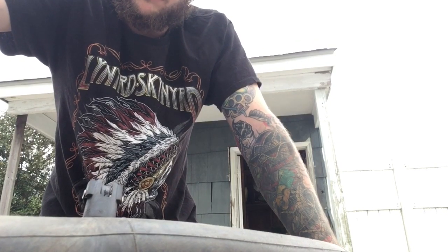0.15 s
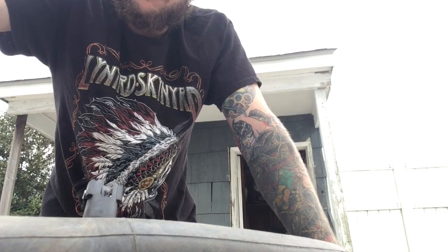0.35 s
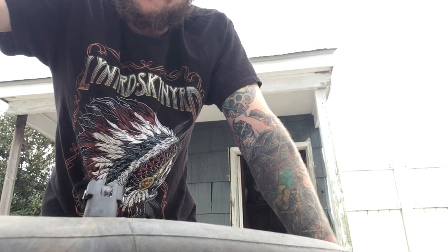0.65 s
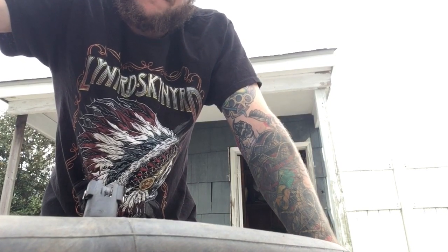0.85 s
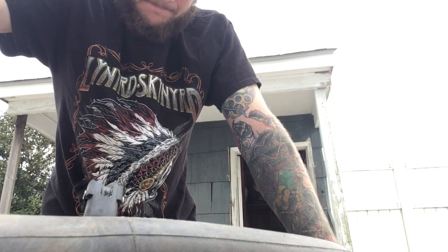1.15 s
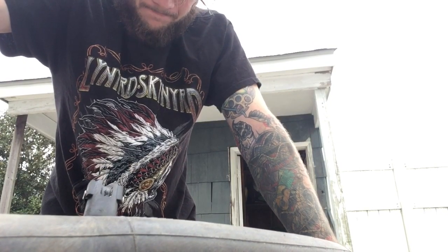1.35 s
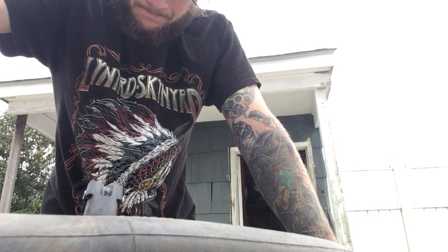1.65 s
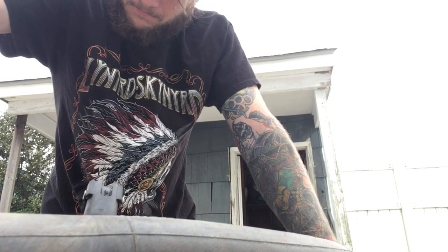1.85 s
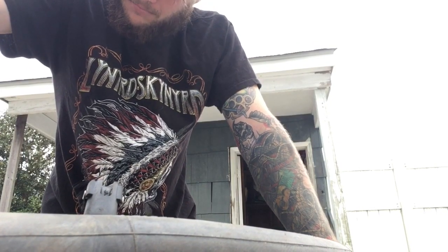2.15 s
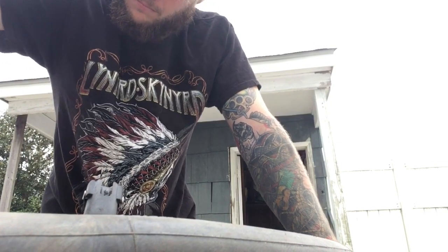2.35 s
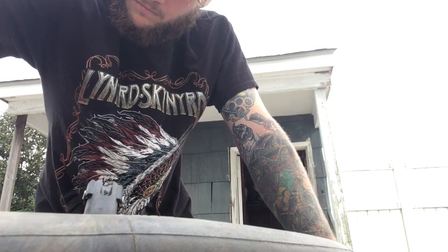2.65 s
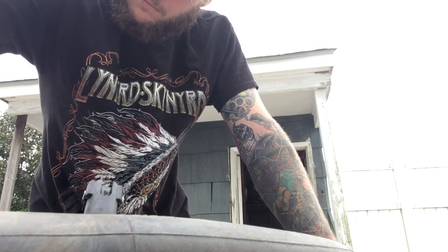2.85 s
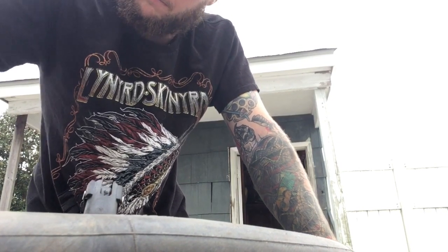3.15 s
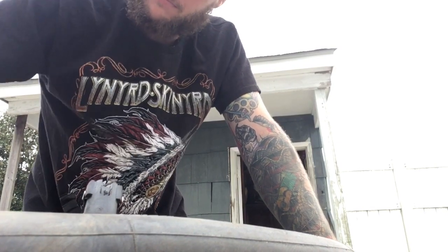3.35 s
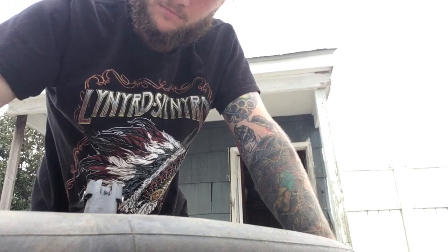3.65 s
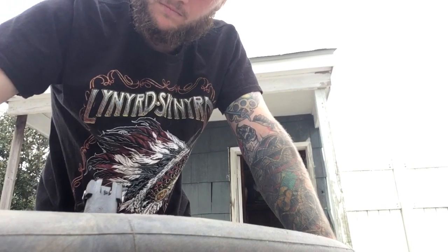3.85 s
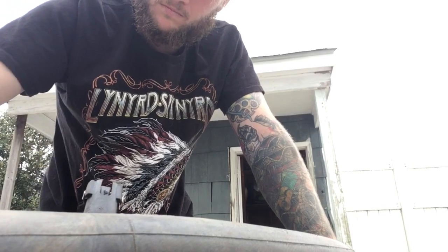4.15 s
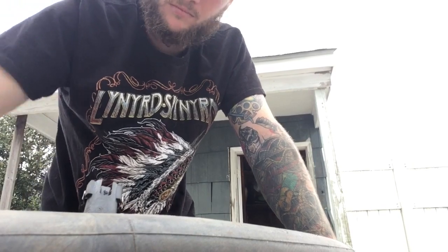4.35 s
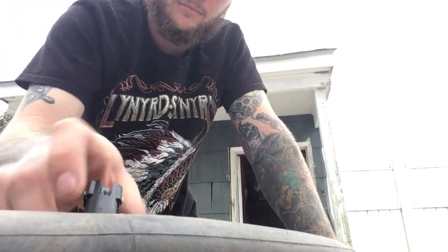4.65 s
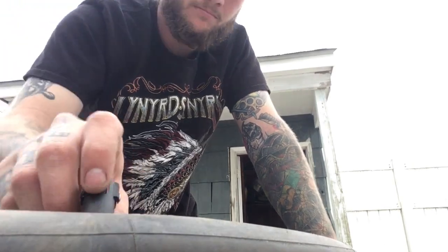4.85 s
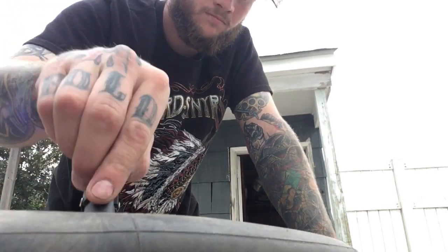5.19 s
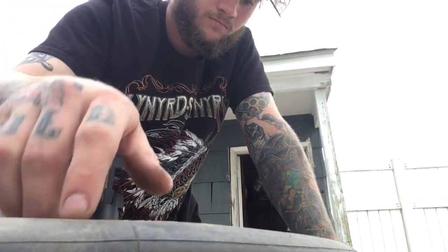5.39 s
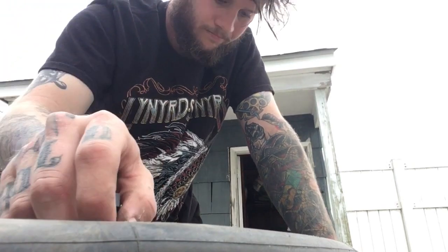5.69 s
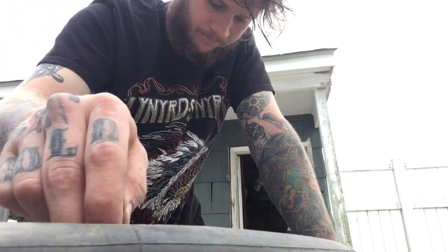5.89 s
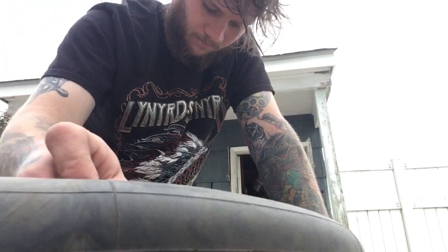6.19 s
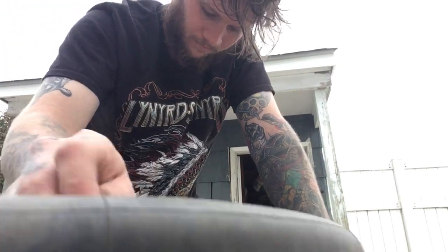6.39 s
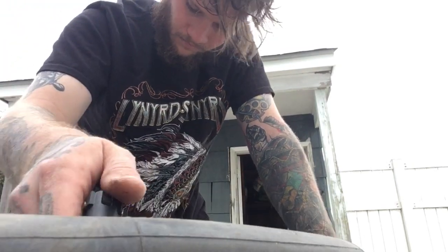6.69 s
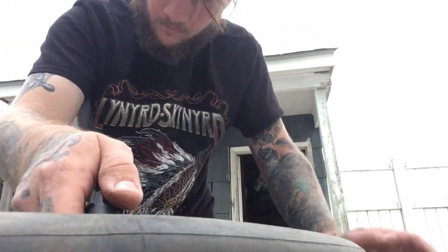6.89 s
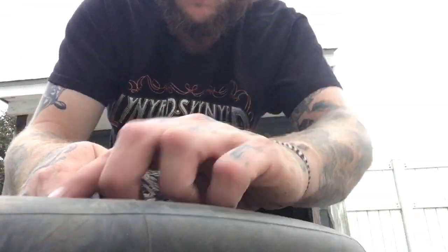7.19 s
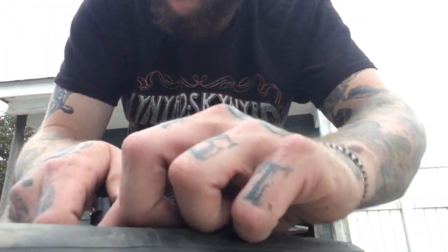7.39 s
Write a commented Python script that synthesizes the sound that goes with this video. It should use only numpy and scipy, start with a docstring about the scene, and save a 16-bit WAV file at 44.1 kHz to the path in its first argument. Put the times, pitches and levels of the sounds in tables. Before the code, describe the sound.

Close, harsh rattling of a little air pump outdoors stops abruptly after four seconds, followed by quiet taps, rubber rubbing and leaking air.

```python
"""Outdoors, close and dry: a small geared piston compressor pumps up a bicycle inner tube, then stops.
Each crank turn flutters the reed valves over gear clatter, hissing air and the hum of the casing;
the motor beats against the crank seven times a second. As it stalls, the casing shudders and gears clack.
Then fingers work the chuck on the valve: decaying noise makes the air spit, leak and blow, ringing modes
make the knocks and the pop of the chuck, and grainy noise makes hands rubbing the tube."""
import sys
import numpy as np
from scipy import signal
from scipy.fft import rfft, irfft
from scipy.io import wavfile

SR = 44100
rng = np.random.default_rng(int(sys.argv[2]) if len(sys.argv) > 2 else 0)


def unload_audio(sound):
    """Save the sound as a 16-bit wav file, at the path given as the first command line argument."""
    columns = np.transpose(np.atleast_2d(sound))
    # keep every value between -1 and 1, then stretch to whole-number steps
    steps = np.round(np.clip(columns, -1, 1) * 32767)
    wavfile.write(sys.argv[1], SR, steps.astype(np.int16))


N = 332073
TIME = np.arange(N) / SR


def amp(db):
    """Decibels to gain."""
    return 10 ** (np.asarray(db) / 20)


def unit(x):
    """Scales to rms 1."""
    return x / np.sqrt(np.mean(x ** 2) + 1e-20)


def curve(rows):
    """Joins rows of (s, value) by straight lines."""
    return np.interp(TIME, *np.transpose(rows))


def add(mix, s, sound):
    """Mixes a sound in from time s."""
    part = mix[round(s * SR):][:len(sound)]
    part += sound[:len(part)]


def colour(x, spectrum, lifts=(), size=4096):
    """Causal filter of energy 1: a smooth spectrum with resonances standing out of it."""
    hz = np.fft.rfftfreq(size, 1 / SR)
    f, db = np.transpose(spectrum)
    power = amp(np.interp(np.log(hz + 1), np.log(f), db)) ** 2
    for centre, width, lift_db in lifts:
        bell = 1 / (1 + (2 * (hz - centre) / width) ** 2)
        power = power * (1 + (amp(lift_db) ** 2 - 1) * bell)
    log_gain = np.log(np.r_[power, power[-2:0:-1]] + 1e-12) / 2
    # minimum phase: the Hilbert transform of the log gain gives the phase
    response = np.exp(np.conj(signal.hilbert(log_gain)))
    taps = np.fft.ifft(response).real[:size // 2]
    return signal.oaconvolve(x, taps / np.linalg.norm(taps))[:len(x)]


def resonate(x, hz, width):
    """One resonance, scaled to rms 1."""
    pole = np.exp((2j * np.pi * hz - np.pi * width) / SR)
    return unit(signal.lfilter([1], [1, -pole], x).real)


def wander(hz):
    """Smooth chance of rms 1, changing about hz times a second."""
    lowpass = np.exp(-(np.fft.rfftfreq(N, 1 / SR) / hz) ** 2)
    return unit(irfft(rfft(rng.standard_normal(N)) * lowpass, N))


def grit(grain_db, size=N):
    """White noise made of grains of uneven size."""
    noise, unevenness = rng.standard_normal((2, size))
    return unit(noise * amp(grain_db * np.clip(unevenness, -2.5, 2.5)))


def ring(modes, length_s=0.29):
    """Dying sines after one blow."""
    t = np.arange(int(length_s * SR)) / SR
    out = np.zeros(len(t))
    for hz, db, t60 in modes:
        out += amp(db) * np.exp(-np.log(1000) * t / t60) * np.sin(2 * np.pi * hz * t)
    return out


def swell(start, attack, hold, t60, db=0):
    """Gain that rises evenly, holds and dies away by 60 dB in t60 seconds."""
    rise = np.clip((TIME - start) / attack, 0, 1)
    since_hold = np.maximum(TIME - start - attack - hold, 0)
    return rise * amp(db) * np.exp(-np.log(1000) * since_hold / t60)


def together(gains):
    """Envelope of several unrelated noises: their powers add."""
    return np.linalg.norm(gains, axis=0)


def rush(gain, spectrum, grain_db=0, flicker_db=1, lifts=()):
    """Unsteady grains of noise of one colour under an envelope, as in turbulence or friction."""
    flicker = amp(flicker_db * wander(60))
    return colour(grit(grain_db) * gain * flicker, spectrum, lifts)


# colour of the open air: pitch_hz, relative_level_db
OUTDOOR_COLOUR = [(15, -44), (25, -8), (70, -1), (241, -14), (572, -22.5), (1060, -24.5), (1430, -26),
                  (2890, -41.5), (11100, -39), (14200, -47.5), (15800, -56)]


def outdoors(level_db=-61):
    """Steady noise, mostly bass, lies quietly behind everything."""
    return amp(level_db) * colour(rng.standard_normal(N), OUTDOOR_COLOUR)


# hands slide on the tube, each slide with some treble; at 6.43 s that treble is the bright part
# of the air jet as the chuck works loose: start_s, attack_s, t60_s, rubber_level_db, treble_level_db
STROKES = [(4.995, .01, 0.61, -62, -78), (5.88, .07, 0.97, -58.5, -70), (5.98, .015, .2, -69, -63),
           (6.43, 0.11, 0.31, -49, -44), (6.528, 0.0085, 0.11, -33, -55), (6.6, .02, 0.24, -46.5, -66),
           (6.92, 0.047, 0.32, -58.5, -65.5), (7.014, 0.009, 0.38, -38, -66),
           (7.293, 0.0091, 0.33, -63, -58), (7.32, 0.028, .35, -56, -69), (7.39, 0.095, 0.13, -49.5, -57)]
# the tube is shifted and rumbles: start_s, attack_s, t60_s, level_db
SHIFTS = [(3.12, .22, 2.2, -41), (5.05, 0.088, 4.3, -56.5), (5.82, 0.059, 1.1, -52.5),
          (6.52, 0.042, 0.63, -45.5), (7.3, .2, 1, -52)]
# soft low noises: at 4.585 and 4.948 s a sleeve brushes by as the arm moves; at 6.15 and 6.537 s
# the low ringing of tube and chuck that lasts after a knock: start_s, attack_s, hold_s, level_db
LOW_SWELLS = [(4.585, 0.08, 0.12, -57), (4.948, 0.17, 0.039, -57.5), (6.15, 0.018, 0.062, -54),
              (6.537, 0.018, .1, -59)]
# colours of rubber, treble, shifted tube and low swells: pitch_hz, relative_level_db
RUBBER_COLOUR = [(150, -21), (250, -7), (302, -21), (420, -6), (852, -6.5), (929, 0), (1360, -6),
                 (1640, -3.5), (2160, -6.5), (9390, -21.5), (15500, -38)]
TREBLE_COLOUR = [(3000, -27), (8000, 0), (11000, -2), (13000, 2), (14500, -8), (15800, -12)]
SHIFT_COLOUR = [(20, -19), (40, -5.5), (65, -0.5), (110, -7), (170, -3.5), (260, -11.5), (420, -18.5),
                (1000, -27), (3000, -45), (12000, -60.5)]
LOW_COLOUR = [(120, -16), (250, -1), (380, -14), (600, -26), (1200, -20), (2200, -38), (6000, -38),
              (12000, -47)]
GRIP_S, GRIP_DB = 4.1, -59  # from here on the hands keep the tube faintly astir
LOW_T60_S = 0.32


def handling():
    """Coloured noise: hands rub and shift the tube, with bright treble and soft low swells."""
    rubber = together([swell(s, attack, 0, t60, db) for s, attack, t60, db, _ in STROKES])
    treble = together([swell(s, attack, 0, t60, db) for s, attack, t60, _, db in STROKES])
    grip = amp(GRIP_DB) * (TIME > GRIP_S)
    shifts = together([swell(s, attack, 0, t60, db) for s, attack, t60, db in SHIFTS] + [grip])
    low = together([swell(s, attack, hold, LOW_T60_S, db) for s, attack, hold, db in LOW_SWELLS])
    out = rush(rubber, RUBBER_COLOUR, grain_db=6, flicker_db=0.7)
    out += rush(treble, TREBLE_COLOUR, grain_db=7, flicker_db=2)
    out += rush(shifts, SHIFT_COLOUR, flicker_db=2.5)
    return out + rush(low, LOW_COLOUR, flicker_db=2)


# chuck and fingers knock on the valve: start_s, thump_gain_db, knock_gain_db, click_gain_db, dull_above_hz
KNOCKS = [(4.995, -60, -54, -45, 5000), (5.086, -53, -50, -31, 1900), (5.146, -46, -50, -60, 1000),
          (5.384, -71, -47.5, -55, 2000), (5.409, -46, -50, -67, 1000), (5.577, -55, -52, -54, 2500),
          (5.891, -33, -54, -31.5, 14000), (6.161, -56, -32, -62, 810), (6.235, -40.5, -44, -64, 700),
          (6.385, -63, -64, -38, 5020), (6.524, -45, -50, -40, 8000), (6.5348, -30, -32, -18.5, 12000),
          (6.55, -42, -52, -28, 6000), (6.61, -56, -51, -34, 5000), (7.299, -47, -51, -55, 3000),
          (7.339, -56, -46, -44, 3000), (7.409, -61, -50, -44, 3000), (7.456, -54, -45, -35, 3000)]
# modes of the chuck on its stem, and of the air-filled tube: pitch_hz, relative_level_db, t60_s
CHUCK_MODES = [(310, -11, 0.063), (391, -7.5, 0.098), (498, -5, 0.027), (690, 3.5, 0.016),
               (915, -0.5, 0.019), (1250, -32, 0.013), (1640, -11, 0.018), (2610, -12, .01)]
TUBE_MODES = [(64.6, -14, 0.27), (107, 2, 0.069), (170, -3, 0.11), (280, 4, 0.0244)]
# colour of the contact click: pitch_hz, relative_level_db
CLICK_COLOUR = [(40, -28), (300, 12), (1200, 7.5), (2700, 4), (4500, -3), (9000, 0.5), (12500, -4),
                (15500, 0)]
CLICK_S = .0016  # decay of the click of every contact, to 1/e


def knocks():
    """Each knock thumps the tube, rings the chuck and clicks."""
    out, thump = np.zeros(N), ring(TUBE_MODES)
    thinning = signal.butter(2, 200, "highpass", fs=SR)  # a small part radiates no bass
    knock = signal.lfilter(*thinning, ring(CHUCK_MODES))
    t = TIME[:len(thump)]
    for s, thump_db, knock_db, click_db, dull_hz in KNOCKS:
        click = colour(rng.standard_normal(len(t)) * np.exp(-t / CLICK_S), CLICK_COLOUR)
        blow = amp(thump_db) * thump + amp(knock_db) * knock + amp(click_db) * click
        softness = signal.butter(2, dull_hz, fs=SR)  # a soft contact passes little treble
        add(out, s, signal.lfilter(*softness, blow))
    return out


# single rushes as the pump bleeds, the valve spits and the air jets out: start_s, attack_s, hold_s, t60_s
BLEED_RUSH = (4.11, .13, .2, .65)
SPIT_RUSH = (5.144, .008, .0055, .03)
JET_RUSH = (6.2, .26, .1, .45)
# the tilted chuck leaks, a gush sinking to a seep: start_s, attack_s, open_for_s, gush_level_db, seep_level_db
LEAKS = [(5.142, 0.018, 0.61, -47.5, -64.5), (6.09, .09, 0.088, -64.5, -68),
         (6.205, 0.052, 0.96, -51.5, -68)]
# colours of the rushes, the leak and the brighter narrow seep: pitch_hz, relative_level_db
BLEED_COLOUR = [(290, -33), (500, 1), (610, -6), (2070, -2.5), (2640, -7), (3830, 0), (4800, -9.5),
                (6210, -2.5), (8250, -13), (15000, -27.5)]
SPIT_COLOUR = [(880, -65), (1500, -30), (2660, -19), (4480, -22), (5400, -29), (7260, -20), (8660, -24),
               (11600, 4), (14900, -3), (15800, -22.5)]
JET_COLOUR = [(290, -39.5), (500, -6), (1180, -3), (1990, 0.5), (2160, 5), (3850, -1.5), (4380, 5),
              (5280, -5), (6740, -2), (9650, -10), (11300, -3), (13000, -11), (15500, -26.5)]
LEAK_COLOUR = [(900, -34.5), (2200, -11), (2800, -4), (3600, -8), (4800, -17.5), (6200, -13), (7300, -8.5),
               (8600, -6.5), (10300, -27), (11600, -14), (13100, -19.5), (15500, -32.5)]
FIZZ_COLOUR = [(5000, -25), (8000, -4), (11500, -4), (13500, -8), (15800, -14)]
# resonances of the gap round the valve: pitch_hz, width_hz, lift_db
GAP = [(2980, 290, 5.5), (3270, 150, 3), (4260, 160, 12.5), (7750, 350, 3)]
BLEED_DB, SPIT_DB, JET_DB = -55, -21, -47.5
FIZZ_DB = -4  # relative to the seep
GUSH_T60_S, SEAL_T60_S = 1.17, 1.4


def escaping_air():
    """Turbulent noise: the pump bleeds down; then the valve spits, leaks and blows as the chuck works loose."""
    bleed = amp(BLEED_DB) * rush(swell(*BLEED_RUSH), BLEED_COLOUR, flicker_db=0.5)
    spit = amp(SPIT_DB) * rush(swell(*SPIT_RUSH), SPIT_COLOUR, flicker_db=3)
    jet = amp(JET_DB) * rush(swell(*JET_RUSH), JET_COLOUR, grain_db=2.5, flicker_db=2)
    gushes = [swell(s, attack, 0, GUSH_T60_S, db) for s, attack, _, db, _ in LEAKS]
    seeps = [swell(s, attack, hold, SEAL_T60_S, db) for s, attack, hold, _, db in LEAKS]
    leak = rush(together(gushes + seeps), LEAK_COLOUR, flicker_db=0.9, lifts=GAP)
    fizz = amp(FIZZ_DB) * rush(together(seeps), FIZZ_COLOUR, flicker_db=1)
    return bleed + spit + jet + leak + fizz


# the casing is jolted as the motor cuts out and as the piston bounces back: start_s, gain_db
JOLTS = [(4.025, 8), (4.114, -1), (4.188, -14)]
# modes of the casing that ring on after each jolt: pitch_hz, relative_level_db, t60_s
SHUDDER_MODES = [(151, -42.5, .45), (176, -36.5, 0.32), (350, -30, 0.12)]
# the stalling crank rocks in the play of its gears: start_s, gain_db
CLACKS = [(4.114, -24), (4.189, -31), (4.21, -35)]
CLACK_S, CLACK_TREBLE_DB = 0.0069, -24  # decay to 1/e; share of the brighter piston colour


def stall():
    """As the pump stops, its casing shudders and the gears clack to and fro."""
    shudder, blows = np.zeros(N), np.zeros(N)
    for s, db in JOLTS:
        add(shudder, s, amp(db) * ring(SHUDDER_MODES))
    for s, db in CLACKS:
        add(blows, s, amp(db) * np.exp(-TIME / CLACK_S))
    blows = blows * rng.standard_normal(N)
    treble = amp(CLACK_TREBLE_DB) * colour(blows, PISTON_COLOUR)
    return shudder + colour(blows, GEAR_COLOUR) + treble


# casing vibration at full speed; the motor turns 4.8 times per crank turn: multiple_of_crank_speed, rms_level_db
HUM = [(1, -59), (2, -53), (3, -54), (3.8, -50), (4, -52), (4.8, -36), (5, -35), (6, -49.5), (7, -47),
       (8, -44.5), (9, -37.5), (9.6, -43), (9.8, -36.5), (10, -37.5), (10.2, -62.5), (10.8, -51.5),
       (11, -41), (11.2, -41), (12, -40), (13, -39.5), (14, -37.5), (15, -39), (17, -47), (21, -45),
       (22, -38.5)]


def hum(turns, push=0.035, motor_lead=0.32):
    """Crank and motor shake the casing, drifting into step once in five strokes."""
    out = np.zeros(N)
    for multiple, db in HUM:
        lead = (multiple - round(multiple)) * motor_lead
        out += amp(db) * np.cos(2 * np.pi * (multiple * (turns - push) + lead))
    return np.sqrt(2) * out


# crank speed, which drives the whole compressor: time_s, turns_per_s
SPEED = [(0, 35.56), (1, 35.47), (2, 35.21), (3, 34.99), (3.5, 34.82), (4.0, 34.73), (4.03, 26), (4.07, 22),
         (4.12, 18), (4.135, 7), (4.19, 0)]
# flutters in each turn: place_turns, length_turns, pitch_at_peak_hz, pitch_fall_share_per_length, peak_db
REEDS = [(.015, .061, 1120, .09, -9.4), (0, .06, 2170, .05, -19), (.22, .04, 1020, .03, -23),
         (.47, .04, 1150, .03, -23), (.75, .04, 1080, .03, -19)]


def reeds(turns, uneven_db=-0.07, stall_db=6):
    """Rushes of air flutter the reeds; pitch sinks as pressure falls, and a slow piston moves them less."""
    out, speed = np.zeros(N), np.maximum(curve(SPEED), 1)
    for place, length, hz, fall, db in REEDS:
        since = (turns - place + .5) % 1 - .5  # turns from the nearest peak
        cycles = hz * since / speed * (1 - fall * since / length / 2)
        envelope = np.exp(-(since / length) ** 2 / 2)
        out += amp(db + uneven_db * wander(30)) * envelope * np.cos(2 * np.pi * cycles)
    return out * amp(stall_db * (speed / speed[0] - 1))


def teeth(turns, repeat, grain_db, crank_share, count=5):
    """Tiny impacts: some recur every turn, some when gear teeth meet again in count turns, the rest are chance."""
    size = round(SR / SPEED[0][1])  # samples in one turn at full speed
    place = np.round(turns * size).astype(int)
    crank, mesh = grit(grain_db, size), grit(grain_db, size * count)
    worn = np.sqrt(crank_share) * crank[place % size]
    worn += np.sqrt(1 - crank_share) * mesh[place % len(mesh)]
    return np.sqrt(repeat) * worn + np.sqrt(1 - repeat) * grit(grain_db)


# after the last full stroke the pump only coasts, until the crank is at rest
LAST_STROKE_S, REST_S = 4.076, 4.19
EFFORT_POWER = 1.2  # the noise of the pump grows with this power of its speed
UNLOAD_S = 0.0073  # how fast the noise drops once no air is pumped


def effort(speed, idle_db):
    """Gain of a pump noise: it follows the speed, and drops when the piston stops compressing."""
    idle = np.clip((TIME - LAST_STROKE_S) / UNLOAD_S, 0, 1)
    return speed ** EFFORT_POWER * amp(idle_db * idle)


# noise gains through one turn: place_turns, gear_clatter_db, piston_air_db, intake_whistle_db
CYCLE = [(.02, 2, 4.5, -8.5), (.13, 2.5, -6, -19), (.22, -1.5, -6, -13.5), (.31, -3, -6, -18),
         (.37, 1.5, -6, -4.5), (.47, 6.5, -2, -1), (.62, 3, -1.5, -10), (.71, 5, 5, -4.5),
         (.81, -1.5, -6, -7), (.88, 8, 6, -0.5)]
# colours of gears and piston air, which the stall's clacks share: pitch_hz, relative_level_db
GEAR_COLOUR = [(100, -38), (250, -19.5), (350, 1), (500, -8), (600, -6.5), (860, -11.5), (1000, 3),
               (1250, -1.5), (1480, -6), (1950, -6.5), (2350, -3), (2850, -11), (4000, -14.5),
               (8000, -30.5)]
PISTON_COLOUR = [(500, -29.5), (2000, 1), (3300, -3.5), (3750, 6), (4000, -23.5), (4500, 0.5), (5500, -1.5),
                 (6100, -2.5), (7000, 4.5), (9000, -3), (10500, -4), (11800, -1), (14000, -11.5),
                 (15800, -17.5)]
# resonances of the casing: pitch_hz, width_hz, lift_db
CASING = [(724, 32, 6), (1146, 14, 8.5), (1368, 30, 7), (1545, 65, 7), (1794, 68, 9), (2105, 64, 7.5),
          (2400, 20, -0.5), (2570, 100, 3.5), (3247, 130, 6), (4277, 75, 8.5), (4620, 18, 5.5),
          (5300, 200, 4.5), (8600, 52, 5.5), (9360, 240, 14), (10970, 270, 5)]
# resonances of the air intake: pitch_hz, width_hz, relative_level_db
INTAKE = [(6860, 160, -1), (7067, 140, 4.5), (7340, 340, 9), (7900, 300, -30.5)]
IDLE_GEARS_DB, IDLE_AIR_DB = -5, -14  # how far the noise drops once no air is pumped
SHAKE_POWER = 4.2  # the hum dies away with this power of the speed


def compressor(gears_db=-24, piston_db=-27.5, intake_db=-31, jitter_turns=.003):
    """Reeds, gear clatter, air and hum all follow the angle of the crank."""
    turns = .34 + np.cumsum(curve(SPEED)) / SR
    turns = turns + jitter_turns * wander(25)
    beat = np.cos(2 * np.pi * (turns - .3) / 5)  # motor against crank
    place, *columns = np.transpose(CYCLE)
    clatter, air, suck = (amp(np.interp(turns, place, column, period=1)) for column in columns)

    impacts = teeth(turns, repeat=.55, grain_db=3, crank_share=.1)
    gears = amp(gears_db) * colour(clatter * impacts, GEAR_COLOUR, CASING)
    puffs = teeth(turns, repeat=0.69, grain_db=2.5, crank_share=0.31)
    piston = amp(piston_db) * colour(air * puffs, PISTON_COLOUR, CASING)
    draught = suck * (TIME < REST_S) * grit(grain_db=2)
    whistle = sum(amp(db) * resonate(draught, hz, width) for hz, width, db in INTAKE)
    intake = amp(intake_db) * unit(whistle)

    speed = curve(SPEED) / SPEED[0][1]  # share of full speed
    rattle = reeds(turns) * amp(0.5 * beat) + gears * amp(0.91 * beat)  # beat depths in dB
    rattle = rattle * effort(speed, IDLE_GEARS_DB)
    hiss = (piston + intake) * amp(0.73 * wander(74)) * effort(speed, IDLE_AIR_DB)
    return rattle + hiss + speed ** SHAKE_POWER * hum(turns)


def scene():
    """Everything is close and dry, over a quiet outdoor background."""
    hands = handling() + knocks()
    pump = stall() + compressor()
    return (outdoors() + hands + escaping_air() + pump)[None]


def record(dry):
    """The microphone loses the deepest bass; then a steep filter takes off the top treble."""
    thinned = signal.lfilter(*signal.butter(2, 42, "highpass", fs=SR), dry)
    taps = signal.firwin(511, 15850, window=("kaiser", 9), fs=SR)  # cutoff in Hz
    return signal.oaconvolve(thinned, taps[None], "same")


dry = scene()
out = record(dry)
unload_audio(out)
```